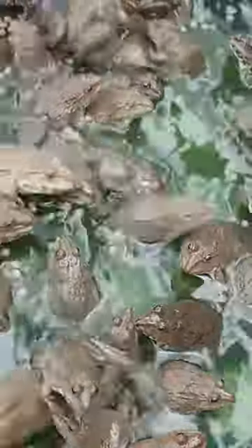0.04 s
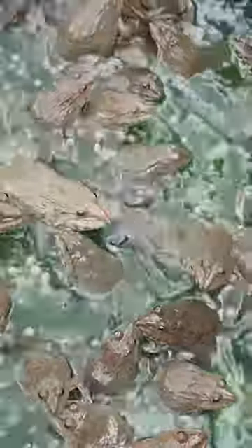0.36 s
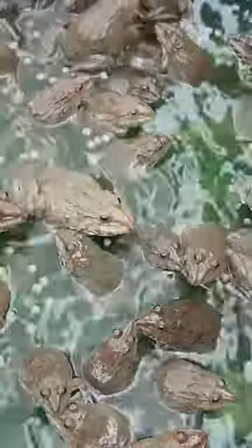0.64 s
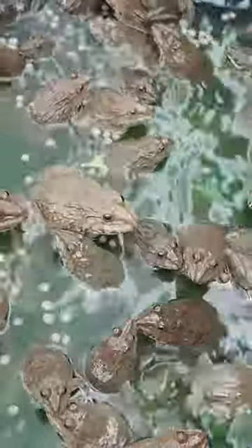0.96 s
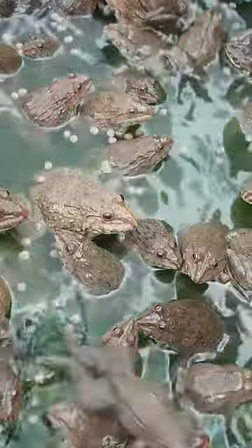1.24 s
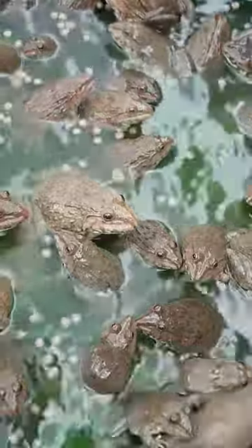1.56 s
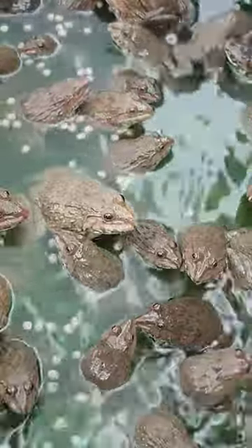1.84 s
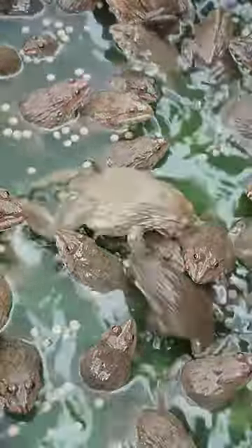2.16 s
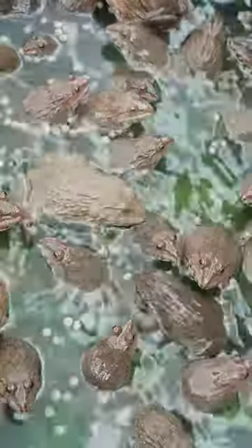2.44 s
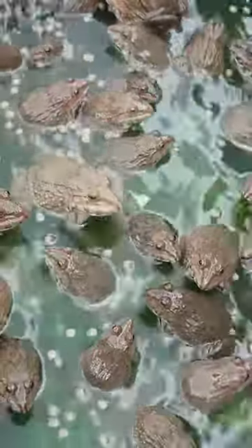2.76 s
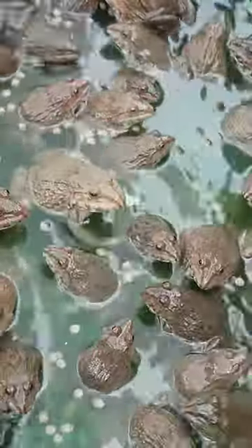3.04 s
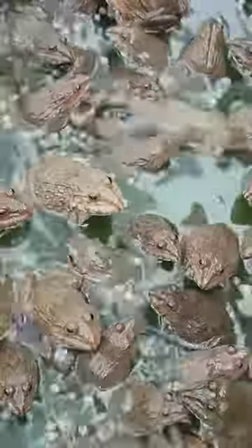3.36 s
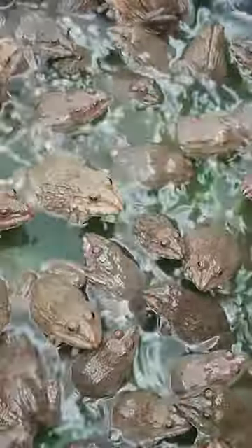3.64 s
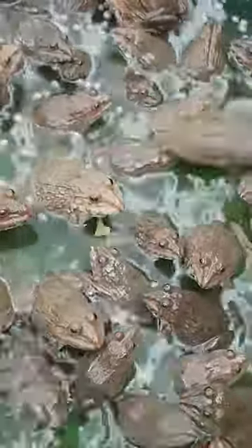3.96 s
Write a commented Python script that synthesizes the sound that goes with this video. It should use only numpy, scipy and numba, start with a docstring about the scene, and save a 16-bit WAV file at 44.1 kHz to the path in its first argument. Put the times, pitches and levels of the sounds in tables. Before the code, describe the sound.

Frogs splash in a shallow pool, close to the microphone and almost entirely on the left. Wet slaps and bubbles give way to a lull with ticking drops, then the splashing builds again over a low hum.

```python
"""Frogs hop and shove about in a shallow pool, heard close up and almost wholly in the left channel.
In the first second bodies slap and plunge, and the trapped air rings as rising bubbles.
A lull follows in which flung drops tick on the surface. After two seconds the stirring builds again,
with more bubbles, slaps and drops. Throughout, the water burbles and fizzes over mains hum and rumble."""
import sys
import numpy as np
from scipy import signal
from scipy.fft import rfft, irfft
from scipy.io import wavfile
from scipy.ndimage import uniform_filter1d, map_coordinates
from numba import njit

SR = 44100
rng = np.random.default_rng(int(sys.argv[2]) if len(sys.argv) > 2 else 0)


def unload_wav(signal):
    """Save mono or channel-first audio to the path in sys.argv[1] as 16-bit WAV at rate SR, clipped to [-1, 1]."""
    wavfile.write(
        sys.argv[1],
        SR,
        np.round(np.clip(np.atleast_2d(signal).T, -1, 1) * 32767).astype(np.int16),
    )


N = 176400

# single air bubbles: start_s, pitch_hz, level_db, t60_s, rise_ratio (share of pitch gained over t60_s)
AIR_BUBBLES = [(0.149, 10190, -21, 0.0072, 0), (0.257, 1640, -19.5, 0.011, 2), (0.294, 1520, -31, 0.084, 2),
               (0.313, 331, -39, 0.21, 2), (0.347, 940, -38, 0.12, 2), (0.395, 590, -30.5, 0.055, 0.3),
               (0.522, 1110, -25.5, 0.021, 3.4), (0.5227, 2420, -28, 0.029, 1.05),
               (0.533, 662, -36.5, 0.067, 0), (0.588, 418, -28, 0.015, 1.8),
               (0.695, 1420, -26.5, 0.017, 0.4), (0.697, 1000, -32.5, 0.056, 0.1),
               (0.79, 414, -29, 0.057, 0.5), (0.833, 1280, -34.5, 0.061, 0), (0.879, 687, -41.5, 0.13, 4.5),
               (0.934, 1090, -38, 0.04, 0.1), (1.067, 1980, -29.5, 0.016, 0.5),
               (1.067, 3570, -32, 0.029, -0.2), (1.657, 596, -32.5, 0.029, 0.3),
               (1.647, 346, -36.5, 0.065, 0.4), (2.171, 235, -41, 0.099, 0.8),
               (2.193, 1174, -48, 0.16, 4.5), (2.229, 319, -38.5, 0.16, 2.5), (2.426, 450, -40.5, 0.2, 0.9),
               (2.49, 730, -36.5, 0.061, 0.1), (2.53, 836, -34.5, 0.072, 4),
               (2.555, 2080, -36.5, 0.043, 1.5), (2.836, 1330, -27, 0.041, 2),
               (2.8364, 2386, -21, 0.015, 0.44), (2.8937, 3700, -26, 0.0086, 0.7),
               (3.07, 1082, -43.5, 0.337, -0.1), (3.149, 876, -41.5, 0.19, 0),
               (3.199, 1925, -30.5, 0.041, 0.2), (3.311, 1474, -27, 0.011, 0.8),
               (3.34, 1231, -30, 0.06, 1.5), (3.348, 1220, -23, 0.02, 1.5), (3.357, 584, -31.5, 0.061, 0.4),
               (3.378, 410, -30.5, 0.031, 1.4), (3.388, 900, -24.5, 0.021, -0.35),
               (3.47, 871, -39, 0.22, 0.8), (3.512, 661, -39.5, 0.14, 1.6), (3.619, 900, -35, 0.02, 0.6),
               (3.634, 2340, -21, 0.011, 1.1), (3.95, 1098, -36.5, 0.054, 1.4),
               (3.965, 1606, -27.5, 0.033, 1.2)]
# bodies and legs striking the water: start_s, level_db, centre_hz
BODY_SLAPS = [(0.063, -29, 5150), (0.08, -30, 5700), (0.27, -36.5, 3630), (0.315, -37, 900),
              (.580, -34, 6240), (0.586, -31.5, 2400), (.682, -37, 3020), (0.752, -35, 4380),
              (0.794, -36.5, 1400), (1.584, -37.5, 1340), (1.6477, -44, 680), (2.53, -47, 2400),
              (2.753, -37, 5200), (2.819, -39, 2400), (2.921, -36, 3800), (3.015, -37, 3620),
              (3.2, -38.5, 3400), (3.348, -36, 2130), (3.379, -36.5, 5100), (3.5626, -37.5, 5040),
              (3.635, -39.5, 2660), (3.963, -38, 1940)]
# dives that drag down a cloud of air: start_s, length_s, level_db, pitch_hz
BODY_PLUNGES = [(0.775, .04, -41.5, 595), (0.798, 0.085, -48, 1320)]
# drops striking the surface: start_s, peak_db
DROP_IMPACTS = [(1.0, -26.5), (1.183, -24), (1.336, -30), (1.5775, -27.5), (1.6465, -35), (1.7283, -32),
                (2.847, -28), (2.9702, -23), (3.0418, -20), (3.6216, -31.5)]
# how hard the water is stirred: time_s, gain_db
STIRRING = [(0, -54.5), (.16, -53.5), (.32, -52.5), (.47, -60.5), (.61, -52.5), (.87, -56), (.98, -59),
            (1.18, -55.5), (1.45, -60.5), (1.76, -61), (1.9, -63), (2.03, -60.5), (2.2, -57.5), (2.31, -52),
            (2.46, -57), (2.7, -52.5), (3.16, -53.5), (3.28, -59), (3.38, -52), (3.52, -58.5),
            (3.66, -53.5), (3.89, -62), (4, -58)]
# strength of the hum's fundamental: time_s, level_db
HUM_ENVELOPE = [(0, -52), (1.4, -54.5), (2.25, -54.5), (2.48, -47), (2.65, -62), (2.85, -46.5), (3.14, -46),
                (3.3, -57.5), (4, -60.5)]
# spectral shapes of the continuous layers: frequency_hz, relative_db
BURBLE_SPECTRUM = [(250, -6), (420, -6.5), (800, 0), (1700, -1.5), (2800, -2.5), (5000, -5), (14000, -18)]
FIZZ_SPECTRUM = [(500, -45), (2000, -0.5), (4500, -4), (7500, -5.5), (11000, -2), (15000, -0.5)]
WASH_SPECTRUM = [(260, -7), (420, 3), (800, -6), (2200, -1.5), (7000, -8), (15000, -7.5)]
RUMBLE_SPECTRUM = [(30, -31), (55, 2.5), (85, 0.5), (180, -16), (280, -35)]


def bubbles(flutter_db=2.1, wobble_s=0.0001):
    """Minnaert resonance: trapped air pulsates, modulated in level and pitch by the moving surface."""
    start_s, hz, db, t60, rise = np.array(AIR_BUBBLES, float).T.copy()
    plops = ring(start_s, hz, undb(db), t60, rise) * undb(flutter_db * drift(220))
    warped_time = np.arange(N) + wobble_s * SR * drift(200)
    return map_coordinates(plops, [warped_time], mode="nearest")


def slaps(grain_db=4, attack_s=0.00018, t60=0.038):
    """Impact noise: a body breaks the surface in a short burst of tiny ruptures."""
    out, envelope = np.zeros(N), decay(t60)
    envelope *= 1 - np.exp(-np.arange(len(envelope)) / (attack_s * SR))
    crackle = rng.standard_normal(N) * undb(grain_db * drift(1500))
    for start_s, db, hz in BODY_SLAPS:
        burst = np.roll(crackle, -int(start_s * SR))[:len(envelope)]
        add(out, start_s, undb(db) * envelope * unit_rms(resonance(burst, hz, width_hz=hz)))
    return out


def plunges(count=45, ring_cycles=6.2, span_octaves=1.7, rise=0.2):
    """Air entrainment: a diving body drags under a cluster of large, heavily damped bubbles."""
    out = np.zeros(N)
    for start_s, length_s, db, centre_hz in BODY_PLUNGES:
        when, strength, pitch = rng.random((count, 3)).T
        hz = centre_hz * 2 ** (span_octaves * (pitch - 0.5))
        cloud = ring(start_s + length_s * when, hz, 0.5 + strength, ring_cycles / hz, np.full(count, rise))
        out += cloud * undb(db) * np.sqrt(length_s * SR / np.sum(cloud ** 2))
    return out


def drops(centre_hz=10100, width_hz=9000, t60=0.0062):
    """A brief impact has a broad spectrum: each flung drop lands with a bright tick."""
    out, envelope = np.zeros(N), decay(t60)
    for start_s, db in DROP_IMPACTS:
        tick = envelope * resonance(rng.standard_normal(len(envelope)), centre_hz, width_hz)
        add(out, start_s, undb(db) * tick / np.abs(tick).max())
    return out


def burble(count=4400, low_hz=400, high_hz=6500, low_t60_s=0.049, scatter_db=3.5, max_rise=0.32):
    """Superposed bubble resonances: large bubbles murmur evenly, a few small ones plink out."""
    when, pitch, chance, sustain, climb = rng.random((count, 5)).T
    hz = low_hz * (high_hz / low_hz) ** pitch
    rarity = -np.log(0.015 + chance)
    db = scatter_db * np.sqrt(pitch) * (rarity - 2)
    t60 = low_t60_s * np.sqrt(low_hz / hz) * (0.5 + sustain)
    cloud = ring(when * N / SR, hz, undb(db) / np.sqrt(t60 * hz), t60, max_rise * climb)
    return shape_spectrum(np.diff(cloud, prepend=0), BURBLE_SPECTRUM)


def fizz(count=1400, scatter_db=4.6, t60=0.012, low_hz=4500, high_hz=15000, ping_db=-7):
    """Shot noise: spray and bursting foam tick at random, each tick leaving a tiny bubble that pings."""
    when, chance, pitch = rng.random((count, 3)).T
    amplitude = undb(-scatter_db * np.log(0.015 + chance))
    impulses = np.zeros(N)
    impulses[(when * N).astype(int)] = amplitude
    power = signal.fftconvolve(impulses ** 2, decay(t60) ** 2)[:N]  # incoherent ticks add in power
    ticks = np.sqrt(np.abs(power)) * rng.standard_normal(N)
    hz = low_hz + (high_hz - low_hz) * pitch
    pings = ring(when * N / SR, hz, amplitude, np.full(count, t60), np.zeros(count))
    return shape_spectrum(unit_rms(ticks) + undb(ping_db) * unit_rms(pings), FIZZ_SPECTRUM)


def wash():
    """Incoherent summation: splashes from the rest of the pool blend into a soft hiss."""
    return shape_spectrum(rng.standard_normal(N), WASH_SPECTRUM)


def reflections(x, t60=0.15):
    """Diffuse reverberation: convolution with a decaying noise tail of unit energy."""
    envelope = decay(t60)
    tail = envelope * rng.standard_normal(len(envelope))
    return signal.fftconvolve(x, tail / np.linalg.norm(tail))[:N]


def hum(mains_hz=59.97, octave_db=-64, waver_db=2, wander_rad=0.17):
    """Harmonics of the mains: a wavering fundamental and its octave drift together in phase."""
    phase = 2 * np.pi * mains_hz * np.arange(N) / SR + wander_rad * drift(7.4)
    fundamental = np.sin(phase) * gain_curve(HUM_ENVELOPE) * undb(waver_db * drift(12))
    return np.sqrt(2) * (fundamental + undb(octave_db) * np.sin(2 * phase))


def rumble(level_db=-56):
    """Noise confined to low frequencies is heard as a steady rumble."""
    return undb(level_db) * shape_spectrum(rng.standard_normal(N), RUMBLE_SPECTRUM)


@njit
def ring(start_s, hz, amplitude, t60, rise):
    """Damped oscillators: a sum of bubbles whose pitch glides, upward as they near the surface."""
    out = np.zeros(N)
    for k in range(len(start_s)):
        first = max(0, int(start_s[k] * SR))
        for i in range(min(int(t60[k] * SR), N - first)):
            t = i / SR
            age = t / t60[k]
            envelope = np.exp(-np.log(1000) * age) * (1 - np.exp(-2 * t * hz[k]))
            phase = 2 * np.pi * hz[k] * t * (1 + rise[k] * age / 2)
            out[first + i] += amplitude[k] * envelope * np.sin(phase)
    return out


def resonance(x, hz, width_hz):
    """Two-pole resonance with unit gain at its centre and a capped bandwidth."""
    limit_hz = 0.4 * SR
    hz, width_hz = min(hz, limit_hz), min(width_hz, limit_hz / 2)
    return signal.lfilter(*signal.iirpeak(hz, hz / width_hz, fs=SR), x)


def shape_spectrum(x, spectrum):
    """Filtering by spectral weighting, scaled to rms 1."""
    hz, db = np.array(spectrum).T
    bin_hz = np.maximum(np.fft.rfftfreq(N, 1 / SR), 1)
    gain = undb(np.interp(np.log(bin_hz), np.log(hz), db))
    return unit_rms(irfft(rfft(x) * gain, N))


def drift(rate_hz):
    """Smoothed random steps give a continuous modulation of rms 1."""
    hold = int(SR / rate_hz)
    steps = np.repeat(rng.standard_normal(N // hold + 1), hold)
    return unit_rms(uniform_filter1d(uniform_filter1d(steps, hold), hold)[:N])


def decay(t60):
    """Exponential decay by 60 dB in t60 seconds."""
    return np.exp(-np.log(1000) * np.arange(int(t60 * SR) + 2) / (t60 * SR))


def gain_curve(points):
    """Amplitude envelope, interpolated in decibels."""
    return undb(np.interp(np.arange(N) / SR, *np.array(points).T))


def add(out, start_s, x):
    """Superpose a short sound at a given time."""
    first = max(0, int(start_s * SR))
    out[first:first + len(x)] += x[:max(0, N - first)]


def undb(db):
    """Decibels to amplitude ratio."""
    return 10 ** (np.asarray(db) / 20)


def unit_rms(x):
    """Normalise to rms 1."""
    return x / np.sqrt(np.mean(x ** 2) + 1e-20)


def scene(patchy_db=1, burble_db=5.5, fizz_db=-3, reflect_db=-12, leak_db=-38, right_diffuse_db=-28.5):
    """Superposition: water, reflections, hum and rumble add on the left; a trace reaches the right."""
    stirring = gain_curve(STIRRING) * undb(patchy_db * drift(45))
    foaming = stirring ** 0.87  # foam swells less than the stirring and bursts on in the lulls
    water = bubbles() + slaps() + plunges() + drops()
    water += stirring * (undb(burble_db) * burble() + wash())
    water += foaming * undb(fizz_db) * fizz()
    left = water + undb(reflect_db) * reflections(water) + hum() + rumble()
    right = undb(leak_db) * left + undb(right_diffuse_db) * reflections(left)
    return np.array([left, right])


def record(dry, port_hz=10050, port_width_hz=340, port_db=-1, cutoff_hz=15600):
    """Port resonance: the microphone rings in the high treble, and a steep low-pass cuts the top."""
    port_ring = undb(port_db) * resonance(dry, port_hz, port_width_hz)
    low_pass = signal.ellip(10, 0.2, 70, cutoff_hz, fs=SR, output="sos")
    return signal.sosfilt(low_pass, dry + port_ring)


dry = scene()
out = record(dry)
unload_wav(out)
```